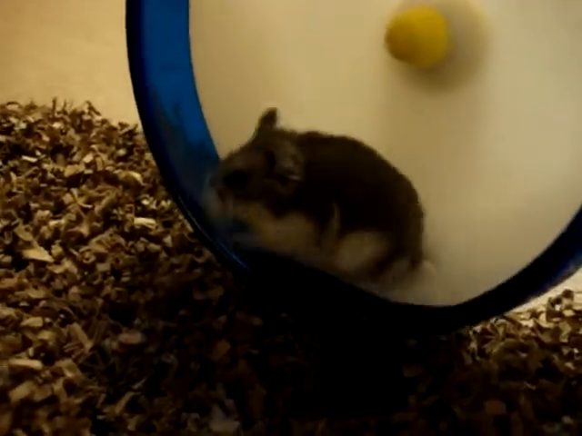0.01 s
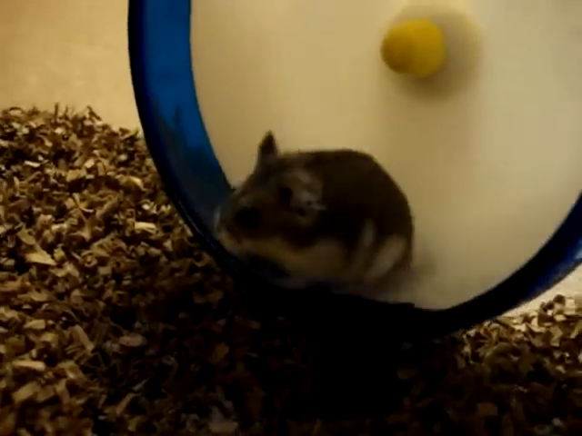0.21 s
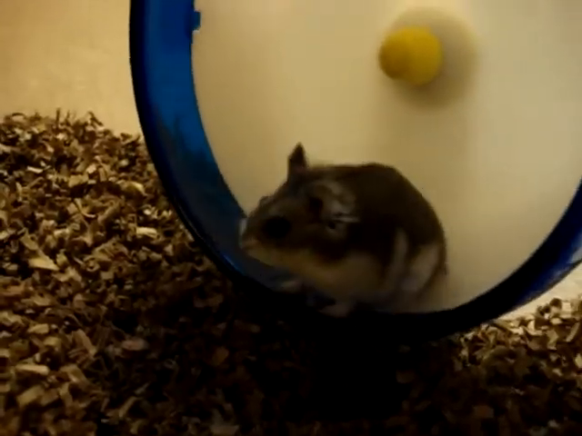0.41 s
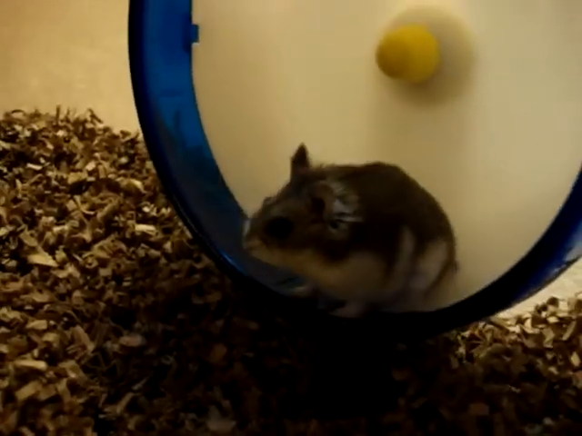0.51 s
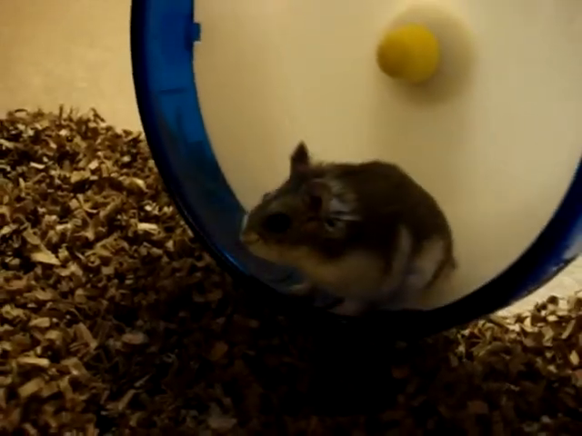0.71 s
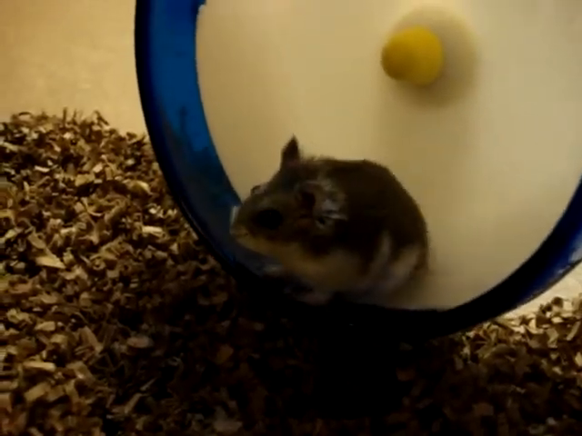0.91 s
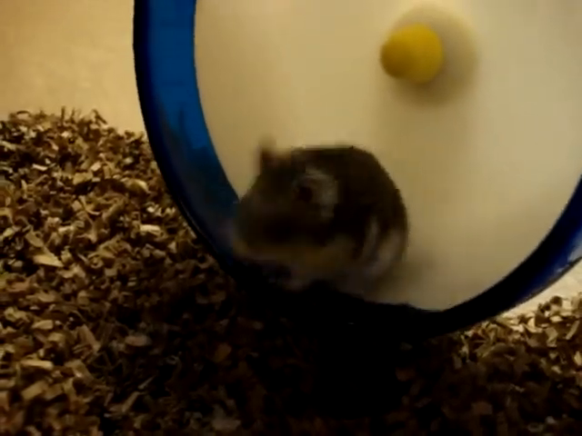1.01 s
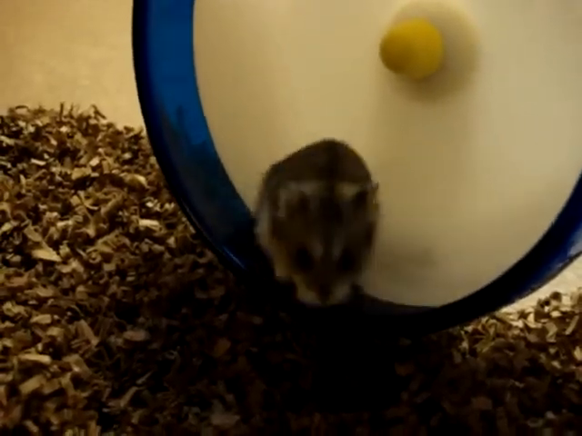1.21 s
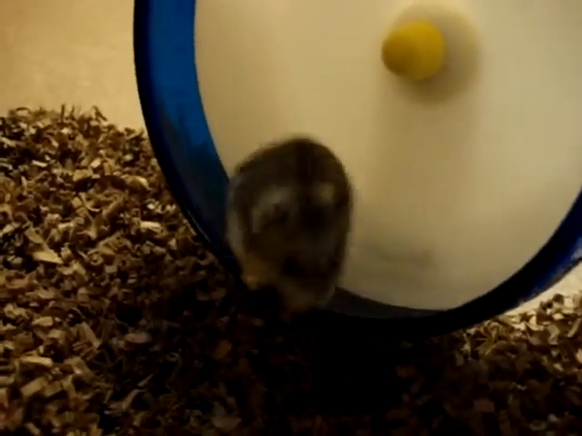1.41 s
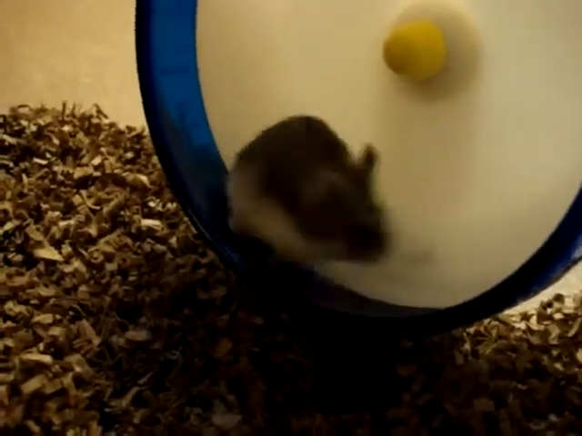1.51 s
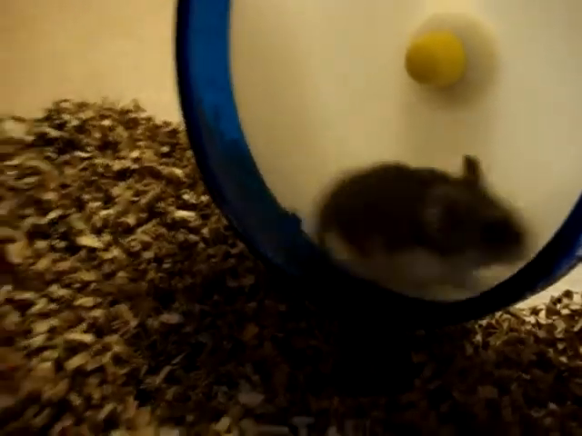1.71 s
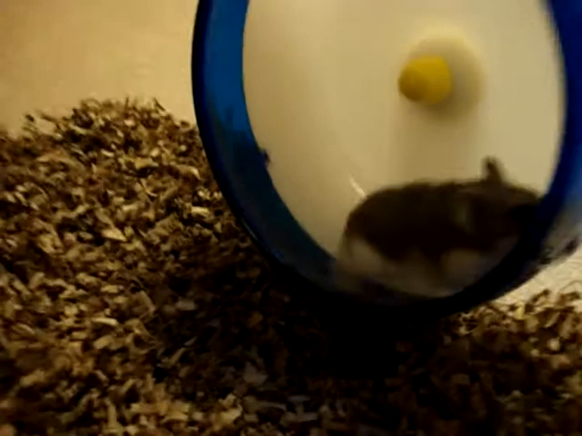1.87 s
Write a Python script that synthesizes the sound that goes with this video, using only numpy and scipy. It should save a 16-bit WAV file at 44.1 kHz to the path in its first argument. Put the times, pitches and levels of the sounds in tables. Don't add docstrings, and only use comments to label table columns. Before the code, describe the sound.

Hamster paws thump a hollow plastic wheel, loud clacks early, later light ticks and faint rolling.

```python
import sys
import numpy as np
from scipy import signal
from scipy.fft import rfft, irfft
from scipy.io import wavfile
from scipy.ndimage import uniform_filter1d

SR = 44100
rng = np.random.default_rng(int(sys.argv[2]) if len(sys.argv) > 2 else 0)


def generate_wav(signal):
    frames = np.transpose(np.atleast_2d(signal))
    scaled = np.clip(frames, -1, 1) * 32767
    pcm = np.round(scaled).astype(np.int16)
    wavfile.write(sys.argv[1], SR, pcm)


def field_ratio(decibels):
    return 10 ** (np.asarray(decibels, dtype=float) / 20)


N = 83790
T = np.arange(N) / SR
HZ = np.maximum(np.arange(N // 2 + 1) * SR / N, 1)


def unit(x):
    return x / np.sqrt(np.mean(x ** 2))


def tint(x, centre_hz, octaves):
    hz = np.maximum(np.arange(len(x) // 2 + 1) * SR / len(x), 1)
    bell = np.exp(-.5 * (np.log2(hz / centre_hz) / octaves) ** 2)
    return irfft(rfft(x) * bell, len(x))


def ring(modes, gains, size):
    t = T[:size]
    out = np.zeros(size)
    for gain, (hz, db, t60_s) in zip(gains, modes):
        out += gain * field_ratio(db) * np.sin(2 * np.pi * hz * t) * field_ratio(-60 * t / t60_s)
    return out


def linger(power, t60_s):
    keep = field_ratio(-120 / t60_s / SR)
    return np.sqrt(signal.lfilter([1 - keep], [1, -keep], power))


def walk(rate_hz):
    hold = int(SR / rate_hz)
    steps = np.repeat(rng.standard_normal(N // hold + 1), hold)
    smooth = uniform_filter1d(uniform_filter1d(steps, hold), hold)
    return unit(smooth[:N])


def add(out, start_s, x):
    i = int(start_s * SR)
    out[i:i + len(x)] += x[:N - i]


# frequency in Hz, level in dB per Hz.
HISS_SPECTRUM = [(15, -63), (25, -15), (113, -3.5), (241, -1.5), (295, -5), (769, -9), (829, -9),
                 (7420, -21), (10300, -27), (13400, -54), (22000, -120)]
HISS_DB = -51.5


def hiss():
    hz, db = np.transpose(HISS_SPECTRUM)
    shape = field_ratio(np.interp(np.log(HZ), np.log(hz), db))
    out = np.zeros(N)
    for centre_hz in 2. ** np.arange(4, 15):
        octave = np.cos(np.pi / 2 * np.clip(np.log2(HZ / centre_hz), -1, 1))
        noise = irfft(rfft(rng.standard_normal(N)) * shape * octave, N)
        out += noise * field_ratio(1.1 * walk(14))
    return field_ratio(HISS_DB) * unit(out)


# frequency in Hz, level in dB, t60 in seconds.
DRUM_MODES = [(282, -3, 0.017), (400, -2.5, 0.062), (530, 0, 0.019), (688.6, -0.5, 0.16), (824, 4.5, 0.13),
              (847, -2.5, .1), (951, 2.5, 0.055), (970, -2.5, 0.16), (1137, 0, .05)]
# start in seconds, peak in dB, pitch in Hz, t60 in seconds.
PAW_KNOCKS = [(.0028, -38, 540, 0.0093), (.004, -38, 317, 0.052), (.005, -28.5, 818, 0.11),
              (.0203, -28, 798, 0.053), (.104, -49.5, 765, 0.21), (.159, -42.5, 680, 0.095),
              (.172, -46, 1020, .03), (.1745, -27, 742, 0.065), (.2255, -19, 714, 0.034),
              (.2325, -15.5, 817, 0.024), (.236, -31, 394, 0.046), (.249, -19, 793, 0.026),
              (.262, -29, 806, 0.04), (.272, -18.5, 713, .1), (.278, -17.5, 990, 0.066),
              (.2872, -14, 769, 0.062), (1.136, -46.5, 760, 0.056), (1.261, -49.5, 788, 0.052),
              (1.553, -55, 770, 0.037), (1.632, -39.5, 795, 0.037), (1.642, -45, 759, 0.17),
              (1.7275, -31.5, 763, 0.023), (1.7312, -28.5, 797, 0.026), (1.7368, -32, 836, 0.019),
              (1.769, -53, 760, 0.079), (1.823, -35.5, 796, 0.033), (1.853, -41.5, 751, 0.086),
              (1.872, -43.5, 775, .16), (1.893, -43.5, 1070, .06)]
OTHER_MODES_DB, SWELL_S, PUSH_S = -20, .001, .0004


def knocks():
    out, size = np.zeros(N), 8000
    push = np.sin(np.pi * np.clip(T[:100] / PUSH_S, 0, 1)) ** 2
    swell = 1 - np.exp(-T[:size] / SWELL_S)
    for start_s, db, hz, t60_s in PAW_KNOCKS:
        signs = np.sign(rng.standard_normal(len(DRUM_MODES)))
        note = ring([(hz, 0, t60_s)], [1], size)
        others = ring(DRUM_MODES, signs * field_ratio(OTHER_MODES_DB), size)
        x = np.convolve((note + others) * swell, push)
        add(out, start_s, field_ratio(db) * x / np.abs(x).max())
    return out


ROOM_T60_S, ROOM_DB, ROOM_HZ, ROOM_OCT = 0.29, -16, 3630, 0.7
DRUM_ROOM_DB = -23


def echo(drum, hard):
    noise = unit(tint(rng.standard_normal(N), ROOM_HZ, ROOM_OCT))
    hard_echo = field_ratio(ROOM_DB) * noise * linger(hard ** 2, ROOM_T60_S)
    tail = rng.standard_normal(N) * field_ratio(-60 * T / ROOM_T60_S)
    tail /= np.sqrt(np.sum(tail ** 2))
    return hard_echo + field_ratio(DRUM_ROOM_DB) * signal.fftconvolve(drum, tail)[:N]


# frequency in Hz, level in dB, t60 in seconds.
RIM_MODES = [(1412, 3, .09), (1588, 0, .07), (1960, -5, .06), (2460, -6, .05), (2590, -6, .05),
             (2870, -7, .045), (3200, -7, .03), (3500, -3, .045), (3845, -4, .04), (4060, -4, .035),
             (4590, -2, .04), (5230, -4, .03), (5700, -4, .025), (6850, -3, .02)]
# start in seconds, level in dB, rattle in ms, brightest Hz, ring share 0-1.
STAND_CLACKS = [
    (0.2246, -27.5, 8.2, 2610, 0.33),
    (.233, -24.5, 1.7, 1670, .2),
    (0.2696, -12.5, 12.8, 4650, 0.64),
    (0.2758, -31.5, 6.7, 4760, 0.83),
    (0.2846, -17, 3.7, 3320, 0.42),
]
CLICKS_PER_S, CLICK_SCATTER_DB, CLACK_OCT = 3000, 3, .9
CRACK_T60_S = 0.037


def clacks():
    out, size, lead = np.zeros(N), 8192, 88
    t = T[:size]
    for start_s, db, rattle_ms, top_hz, ring_share in STAND_CLACKS:
        hit = rng.random(size) < CLICKS_PER_S / SR
        clicks = hit * field_ratio(CLICK_SCATTER_DB * rng.standard_normal(size)) * rng.choice([-1, 1], size)
        clicks[0] = 2
        clicks *= np.exp(-(t / (rattle_ms / 1000)) ** 4)
        crack = np.zeros(size)
        for hz in (1200, 2400, 4800, 9600):
            band = tint(rng.standard_normal(size), hz, .4) / hz ** .25
            crack += band * linger(clicks ** 2, CRACK_T60_S * 3000 / hz)
        signs = np.sign(rng.standard_normal(len(RIM_MODES)))
        rim = signal.fftconvolve(clicks, ring(RIM_MODES, signs, size))[:size]
        x = ring_share * unit(rim) + (1 - ring_share) * unit(crack)
        x = tint(np.roll(x * (t < .15), lead), top_hz, CLACK_OCT)
        rattle_rms = np.sqrt(np.sum(x ** 2) / (rattle_ms / 1000 * SR))
        add(out, start_s - lead / SR, field_ratio(db) * x / rattle_rms)
    return out


THUMP_S, THUMP_DB, THUMP_MS = .271, -22.5, 4.26


def thump():
    u = np.clip((T - THUMP_S) / (THUMP_MS / 1000), 0, None)
    return field_ratio(THUMP_DB) * u * np.exp(1 - u) * (1 - u / 2)


# start in seconds, peak in dB, brightest Hz, width in octaves, t60 in seconds.
CLAW_TICKS = [
    (.803, -34, 3500, .5, .014),
    (1.397, -47, 6000, .4, .02),
    (1.7035, -27.5, 3100, .62, .026),
    (1.733, -43, 3500, .5, .03),
    (1.8205, -38, 3900, .25, .02),
    (1.895, -44, 2700, .3, .03),
]


def ticks():
    out, size, lead = np.zeros(N), 2048, 88
    for start_s, db, top_hz, octaves, t60_s in CLAW_TICKS:
        x = .45 * rng.standard_normal(size) * field_ratio(-60 * T[:size] / t60_s)
        x[0] = 3
        x = tint(np.roll(x, lead), top_hz, octaves)
        add(out, start_s - lead / SR, field_ratio(db) * x / np.abs(x).max())
    return out


ROLL_FROM_S, ROLL_RISE_S, ROLL_DB, ROLL_HISS_DB = 1.486, 0.39, -52.5, -53.5
ROLL_HZ, ROLL_T60_S = 748, 0.069


def rolling():
    rise = np.clip((T - ROLL_FROM_S) / ROLL_RISE_S, 0, 1)
    grit = rng.standard_normal(N) * field_ratio(3.8 * walk(39.9))
    note = ring([(ROLL_HZ, 0, ROLL_T60_S)], [1], 8000)
    drum = unit(signal.fftconvolve(grit, note)[:N])
    rustle = unit(tint(grit, 1700, 1.5))
    return rise * (field_ratio(ROLL_DB) * drum + field_ratio(ROLL_HISS_DB) * rustle)


def scene():
    drum = knocks()
    hard = clacks() + ticks()
    return (hiss() + drum + echo(drum, hard) + hard + thump() + rolling())[None]


# start in seconds, end in seconds, low Hz, high Hz, gain in dB.
STARVED_BANDS = [(.199, .222, 680, 12000, -30), (.236, .266, 3900, 12000, -16),
                 (.245, .266, 2400, 12000, -12), (.258, .266, 2000, 12000, -20),
                 (.283, .306, 6300, 12000, -8), (.29, .306, 4600, 12000, -8),
                 (.298, .305, 5000, 12000, -14), (.333, .34, 6200, 12000, -12),
                 (.788, .799, 4500, 7000, -8), (1.677, 1.692, 2700, 4400, -9),
                 (1.683, 1.699, 3200, 4900, -18)]


def starve(x):
    for start_s, end_s, lo_hz, hi_hz, db in STARVED_BANDS:
        gate = np.clip(np.minimum(T - start_s, end_s - T) / .003 + .5, 0, 1)
        window = np.clip(np.minimum(HZ - lo_hz, hi_hz - HZ) / 250 + .5, 0, 1)
        x = x - gate * (1 - field_ratio(db)) * irfft(rfft(x) * window, N)
    return x


HOLE_SHARE, HOLE_FROM_HZ, HOLE_DB = .08, 4000, -14


def punch_holes(x):
    hz, _, z = signal.stft(x, SR, nperseg=512)
    holes = rng.random((40, 200)) < HOLE_SHARE
    holes = np.repeat(np.repeat(holes, 7, axis=0), 2, axis=1)[:len(hz), :z.shape[2]]
    quiet = (np.abs(z[0]).max(axis=0) < field_ratio(-50)) & (hz[:, None] > HOLE_FROM_HZ)
    return signal.istft(z * np.where(holes & quiet, field_ratio(HOLE_DB), 1), SR)[1][:, :N]


def top_cut(x):
    return signal.sosfilt(signal.butter(12, 10440, fs=SR, output="sos"), x)


CEILING, TOP_HZ = .56, 10130


def record(dry):
    x = CEILING * 1.2 * np.tanh(dry / CEILING / 1.2)
    x = punch_holes(starve(x))
    x = irfft(rfft(x) * field_ratio(np.clip((TOP_HZ - HZ) / 5, -45, 0)), N)
    return top_cut(x)


dry = scene()
out = record(dry)
generate_wav(out)
```